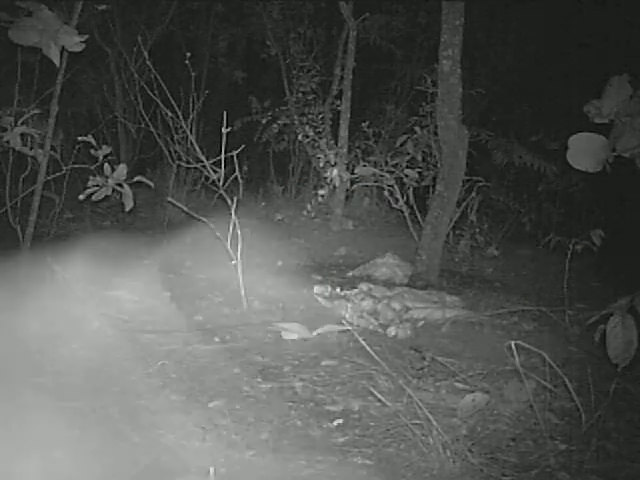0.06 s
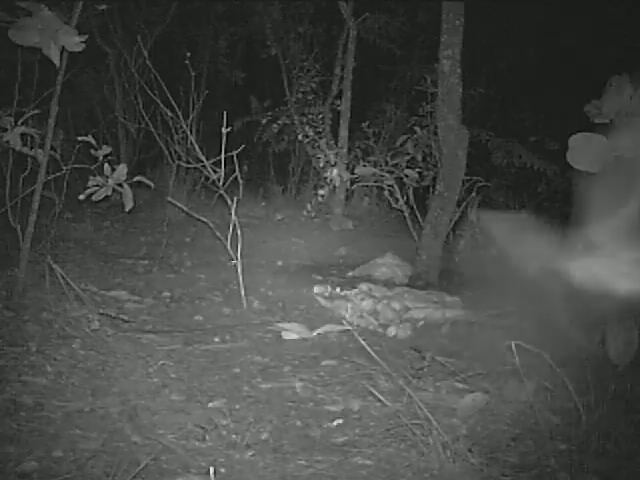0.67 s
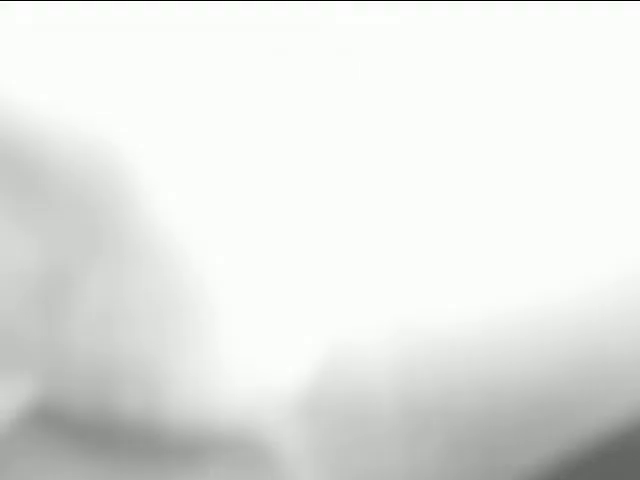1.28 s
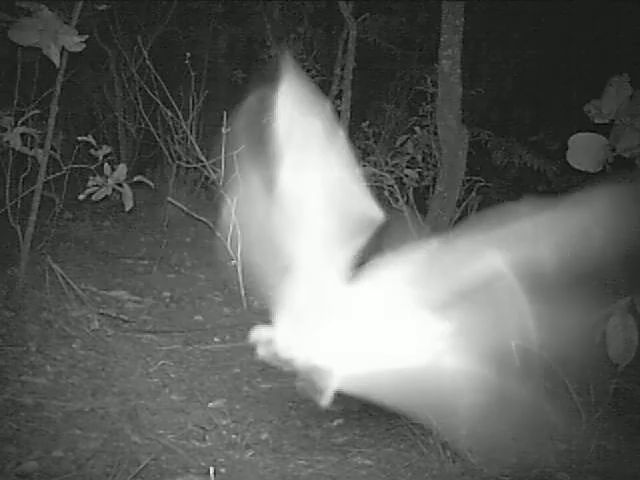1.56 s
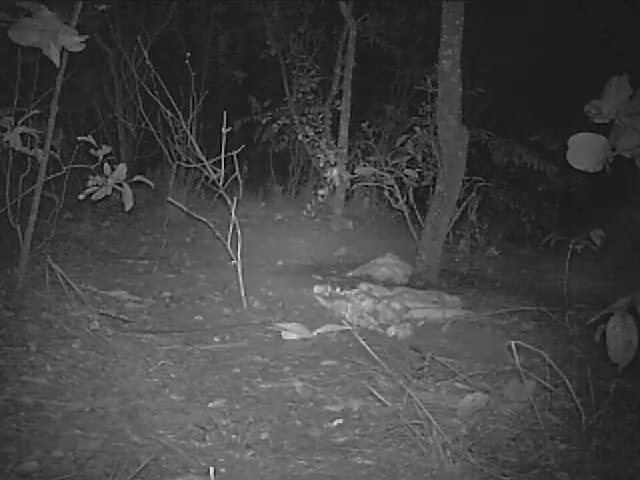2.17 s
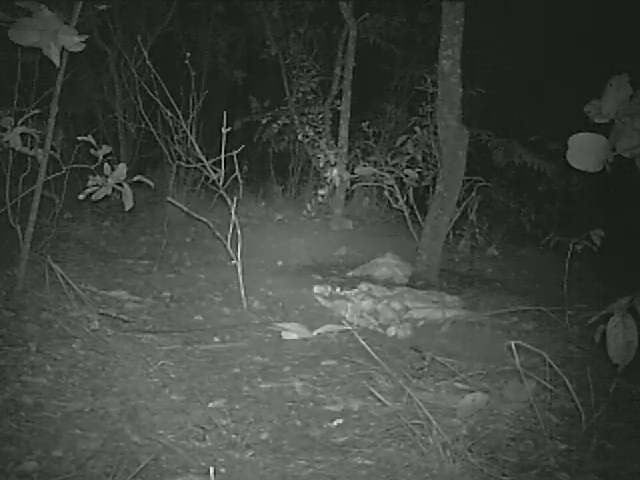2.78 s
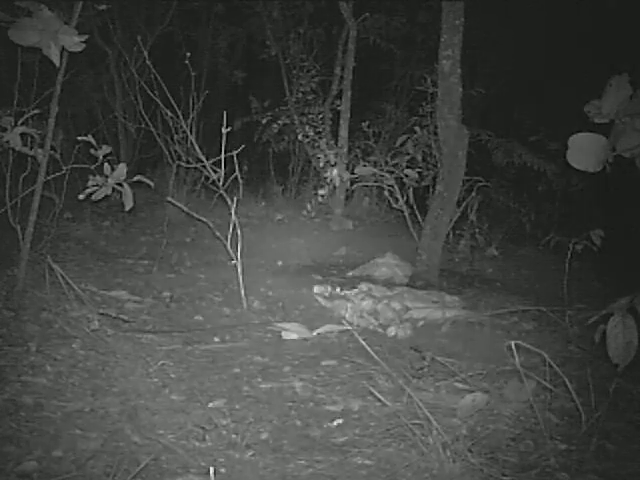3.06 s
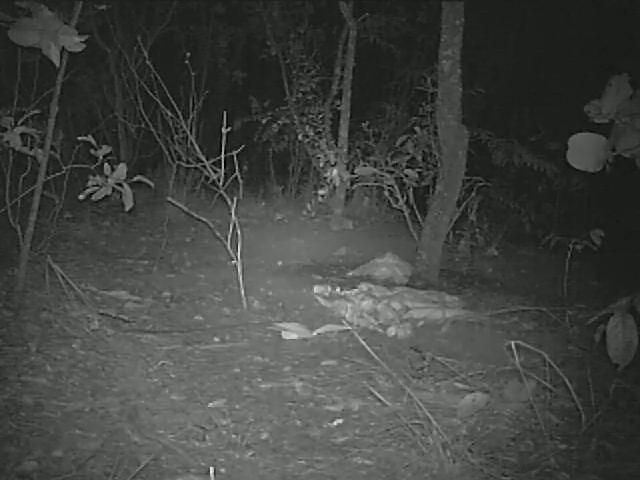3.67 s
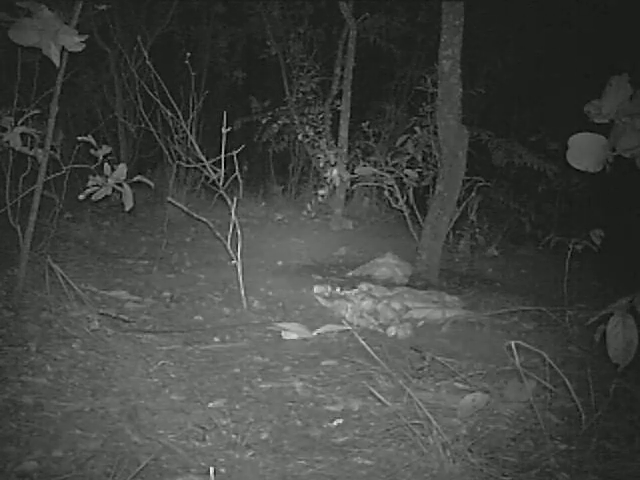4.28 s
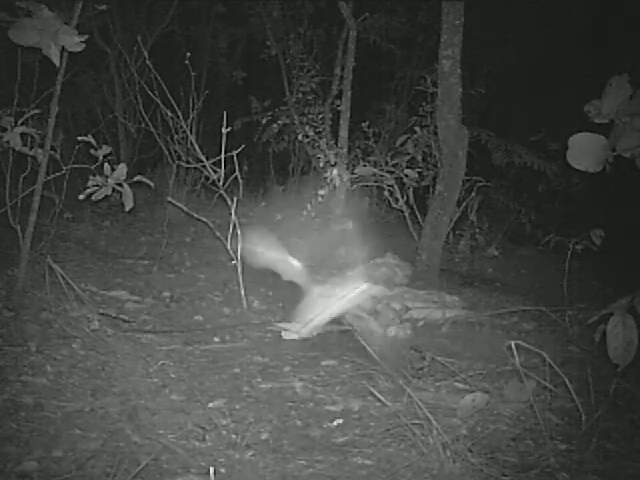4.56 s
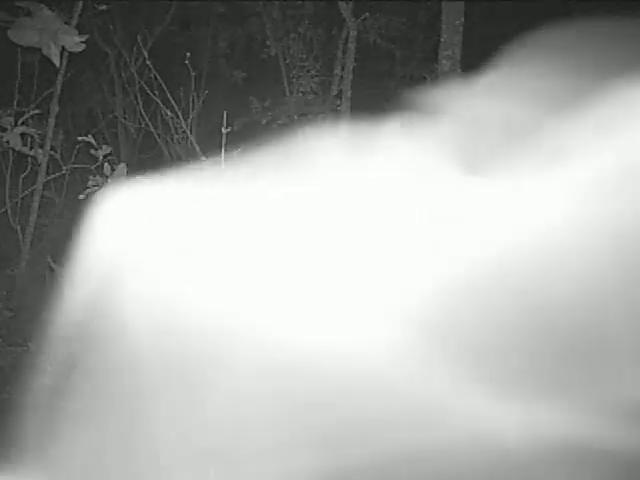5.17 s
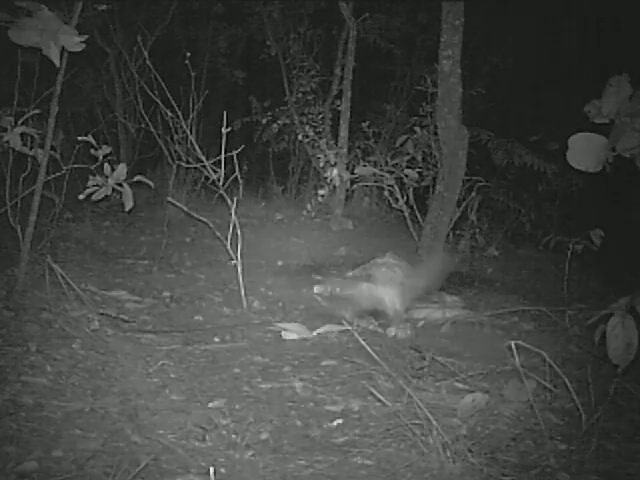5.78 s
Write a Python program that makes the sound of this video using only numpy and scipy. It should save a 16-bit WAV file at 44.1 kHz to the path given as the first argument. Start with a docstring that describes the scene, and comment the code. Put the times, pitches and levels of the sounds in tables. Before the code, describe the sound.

Soft, rapid wing thumps and rushes of air come and go as bats fly past, over a faint low rumble.

```python
"""Bats swoop past a trail camera in a still forest at night: four passes, three very close.
Even wingbeats pull and push the air as a bat nears and leaves; close flaps hit the microphone
and shed eddies. A churning wake follows each bat; recorder hiss swells with each wing thump.
Approaching bats tick faintly with sonar. A few clicks sit over a low rumble and a thin whine."""
import sys
import numpy as np
from scipy import signal
from scipy.fft import rfft, irfft, next_fast_len
from scipy.io import wavfile
from scipy.ndimage import map_coordinates

SR = 44100
rng = np.random.default_rng(int(sys.argv[2]) if len(sys.argv) > 2 else 0)


def to_wav(sig):
    """Store sig (one row per channel, or 1-D mono) as 16-bit WAV at the path in sys.argv[1].

    Samples outside -1..1 are clipped; the rate is SR.
    """
    pcm = np.clip(np.atleast_2d(sig), -1, 1) * 32767
    pcm = np.round(pcm).astype(np.int16)
    wavfile.write(sys.argv[1], SR, pcm.T)  # frames by channels


N = 261072
TIME_S = np.arange(N) / SR

# Close flaps (polarity 1: push first, -1: pull first):
# time_s, polarity, swell_db, width_s, rebound_delay_s, rebound_db, eddy_relative_db
CLOSE_FLAPS = [(0.042, -1, -12, 0.009, 0.027, -23, -48.5), (0.092, -1, -18.5, 0.014, 0.03, -63, -61),
               (0.159, 1, -17.5, 0.012, 0.034, -20.5, -48.5), (0.212, 1, -18, 0.0052, 0.0063, -28, -54.5),
               (0.239, 1, -23.5, 0.024, 0.02, -16.5, -48), (0.287, 1, -23, 0.023, 0.05, -21, -75),
               (0.338, 1, -11.5, 0.0088, 0.043, -24.5, -37), (1.158, -1, -14.5, 0.01, 0.028, -19.5, -48),
               (1.213, -1, -19, 0.012, 0.012, -40.5, -65), (1.282, 1, -21.5, 0.023, 0.014, -22, -58),
               (1.323, -1, -21, 0.014, 0.01, -15, -40), (1.378, -1, -18.5, 0.015, 0.016, -22, -45),
               (1.399, -1, -20.5, 0.0054, 0.019, -29, -51), (1.434, 1, -19.5, 0.011, 0.016, -23, -35.5),
               (1.549, 1, -18.5, 0.011, 0.017, -23.5, -44.5), (2.433, 1, -50, 0.0054, 0.01, -58, -68),
               (5.057, -1, -17, 0.0086, 0.013, -19.5, -56), (5.106, -1, -19.5, 0.016, 0.015, -43, -53),
               (5.14, 1, -17.5, 0.0074, 0.024, -17.5, -36.5), (5.188, 1, -18, 0.024, 0.0083, -24.5, -49),
               (5.214, -1, -14.5, 0.0079, 0.022, -52, -32.5), (5.261, 1, -17, 0.012, 0.019, -19, -34)]
# Runs of even wingbeats: first_s, last_s, first_db, last_db
BEAT_RUNS = [(0.462, 0.764, -31, -48), (0.935, 1.116, -53, -19.5), (1.588, 1.837, -43.5, -44),
             (2.144, 2.455, -45, -30), (2.52, 2.713, -31.5, -46.5), (4.767, 5.011, -35, -18),
             (5.36, 5.767, -26.5, -60)]
# Wake of each pass: arrive_s, leave_s, level_db, rise_db_per_s, fall_db_per_s
WAKES = [(0.25, 0.39, -37, 25, 140), (1.32, 1.56, -34.5, 55, 200), (2.42, 2.48, -49, 35, 150),
         (5.16, 5.3, -30, 72, 260)]
# Runs of sonar ticks: start_s, end_s, rate_hz, first_db, last_db
SONAR_RUNS = [(0.026, .30, 65, -51.5, -69), (1.024, 1.24, 71, -66, -64), (2.277, 2.47, 55, -69, -72),
              (4.81, 5.045, 77, -66, -56.5)]
# Clicks: time_s, peak_db
SHARP_CLICKS = [(0.3916, -27.5), (1.1694, -22)]
SOFT_CLICKS = [(2.7469, -48), (5.8127, -53.5)]
# Noise spectra: frequency_hz, relative_density_db
EDDY_SPECTRUM = [(60, -31), (110, -1.5), (175, -1.5), (250, -9), (360, -13), (480, -18), (700, -32.5),
                 (1200, -49), (3000, -66)]
WAKE_SPECTRUM = [(10, -11.5), (22, 2), (45, -2), (80, -10.5), (130, -23.5), (220, -32.5), (450, -48),
                 (900, -82), (2000, -66)]
HISS_SPECTRUM = [(200, -24), (600, 11.5), (1500, 9.5), (3000, 7.5), (5000, 3.5), (8000, 1.5), (11000, -1),
                 (15500, -5)]
NIGHT_SPECTRUM = [(10, 6), (22, 7), (65, -5.5), (100, -8), (150, -11.5), (300, -17), (700, -24.5),
                  (1200, -28), (3000, -31.5), (6000, -34.5), (15500, -37.5)]


def close_flaps(rebound_width_ratio=0.66):
    """Each flap: a pressure swell, then an opposite rebound; later rebounds are broader."""
    time_s, polarity, swell_db, width_s, delay_s, rebound_db, _ = np.transpose(CLOSE_FLAPS)
    swell = swells(time_s, polarity * amp(swell_db), width_s)
    rebound = swells(time_s + delay_s, polarity * amp(rebound_db), rebound_width_ratio * delay_s)
    return swell - rebound


def wingbeats(beat_hz=16.2, flip_s=0.0082, span_s=0.01):
    """Even beats further off: a pull builds, flips to a push and ebbs."""
    impulses = np.zeros(N)
    for first_s, last_s, first_db, last_db in BEAT_RUNS:
        count = round((last_s - first_s) * beat_hz) + 1
        beat_samples = np.searchsorted(TIME_S, np.linspace(first_s, last_s, count))
        impulses[beat_samples] += amp(np.linspace(first_db, last_db, count))
    offset_s = np.arange(-SR // 10, SR // 10) / SR
    beat = np.tanh(offset_s / flip_s) / np.cosh(offset_s / span_s)
    return signal.fftconvolve(impulses, beat, "same")


def eddies(gain_db=1.5, life_s=0.012, lag_s=0.0032):
    """Air tumbles off the wing just after mid-flap; bursts add in power."""
    time_s, _, swell_db, _, delay_s, rebound_db, eddy_db = np.transpose(CLOSE_FLAPS)
    middle_s = time_s + delay_s / (1 + amp(swell_db - rebound_db) ** 2)
    power = swells(middle_s + lag_s, amp(eddy_db + gain_db) ** 2, life_s)
    return np.sqrt(power) * noise(EDDY_SPECTRUM)


def wake(linger_db=-31.5, linger_fall_db_per_s=5.5):
    """Stirred air builds as a bat nears, churns, then drops and lingers faintly."""
    envelope = np.zeros(N)
    for arrive_s, leave_s, level_db, rise_db_per_s, fall_db_per_s in WAKES:
        before_s = np.maximum(arrive_s - TIME_S, 0)
        after_s = np.maximum(TIME_S - leave_s, 0)
        build = amp(level_db - rise_db_per_s * before_s)
        decay = amp(-fall_db_per_s * after_s) + amp(linger_db - linger_fall_db_per_s * after_s)
        envelope += build * decay
    return envelope * noise(WAKE_SPECTRUM)


def sonar(pitch_hz=3080, width_s=0.0008, scatter_db=2, jitter_periods=0.04):
    """Audible part of the bats' calls: runs of tiny ticks, each run rising or fading."""
    envelope = np.zeros(N)
    for start_s, end_s, rate_hz, first_db, last_db in SONAR_RUNS:
        times_s = np.arange(start_s, end_s, 1 / rate_hz)
        level_draw, time_draw = rng.standard_normal((len(times_s), 2)).T
        level_db = np.linspace(first_db, last_db, len(times_s)) + scatter_db * level_draw
        envelope += swells(times_s + jitter_periods * time_draw / rate_hz, amp(level_db), width_s)
    return envelope * np.sin(2 * np.pi * pitch_hz * TIME_S + 0.2 * wobble(rate_hz=1400))


def recorder_hiss(pressure, stirred, thump_gain_db=-39, exponent=0.94, stir_gain_db=-46, flicker_db=4):
    """Grainy companding noise of the recorder: swells with each wing thump, faint between them."""
    thump_level = amp(thump_gain_db) * np.abs(pressure) ** exponent
    envelope = np.hypot(thump_level, amp(stir_gain_db) * stirred)
    flicker = amp(flicker_db * np.tanh(wobble(rate_hz=350)))
    return envelope * unit_rms(flicker * noise(HISS_SPECTRUM))


def clicks(width_s=0.00019, relax_s=0.0023):
    """Dry clicks: sharp ones are square dips, soft ones a step that relaxes."""
    out = np.zeros(N)
    for time_s, peak_db in SHARP_CLICKS:
        out[round(time_s * SR):][:round(width_s * SR)] -= amp(peak_db)
    step = np.exp(-TIME_S[:SR // 100] / relax_s)
    for time_s, peak_db in SOFT_CLICKS:
        out[round(time_s * SR):][:len(step)] -= amp(peak_db) * step
    return out


def night(level_db=-61):
    """Faint low rumble and even hiss."""
    return amp(level_db) * noise(NIGHT_SPECTRUM)


def camera_whine(level_db=-91, pitch_hz=15625):
    """Thin, steady line whine of the camera."""
    return amp(level_db) * np.sin(2 * np.pi * pitch_hz * TIME_S)


def amp(level_db):
    """Decibels to gain."""
    return 10 ** (np.asarray(level_db) / 20)


def unit_rms(x):
    """Scale to rms 1."""
    return x / np.sqrt(np.mean(x ** 2) + 1e-20)


def filtered(x, response):
    """Apply a frequency response by zero-padded FFT."""
    size = next_fast_len(N + SR // 2)
    return irfft(rfft(x, size) * response(np.fft.rfftfreq(size, 1 / SR)), size)[:N]


def noise(spectrum):
    """Noise of rms 1, spectrum interpolated over log frequency."""
    points_hz, points_db = np.transpose(spectrum)
    response = lambda hz: amp(np.interp(np.log(hz + 1), np.log(points_hz), points_db))
    return unit_rms(filtered(rng.standard_normal(N), response))


def wobble(rate_hz):
    """Smooth random curve with knots at rate_hz."""
    knots = rng.standard_normal(int(N * rate_hz / SR) + 4)
    return map_coordinates(knots, [TIME_S * rate_hz])


def swells(times_s, peaks, widths_s):
    """Sum of sech pulses; widths at half height."""
    out = np.zeros(N)
    for time_s, peak, width_s in np.broadcast(times_s, peaks, widths_s):
        near = slice(*np.searchsorted(TIME_S, [time_s - 10 * width_s, time_s + 10 * width_s]))
        out[near] += peak / np.cosh(2 * np.arccosh(2) * (TIME_S[near] - time_s) / width_s)
    return out


def scene():
    """Bats over the night background: close, dry, mono."""
    pressure = wingbeats() + close_flaps()
    stirred = eddies() + wake()
    hiss = recorder_hiss(pressure, stirred)
    return (pressure + stirred + hiss + sonar() + clicks() + night() + camera_whine())[None]


def record(dry, leak_hz=3, band_limit_hz=15850):
    """The microphone leaks steady pressure; the camera cuts all above its band limit."""
    response = lambda hz: 1j * hz / (leak_hz + 1j * hz) * (hz < band_limit_hz)
    return np.array([filtered(channel, response) for channel in dry])


dry = scene()
out = record(dry)
to_wav(out)
```